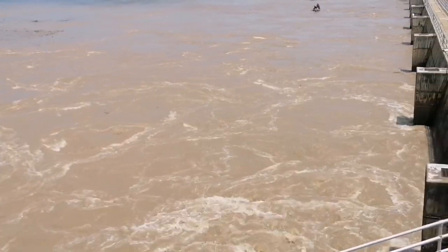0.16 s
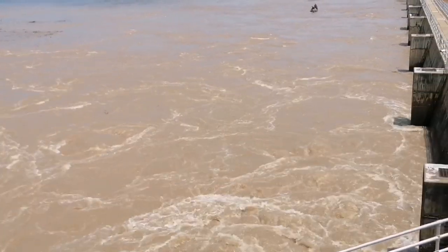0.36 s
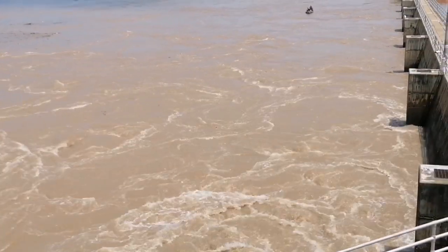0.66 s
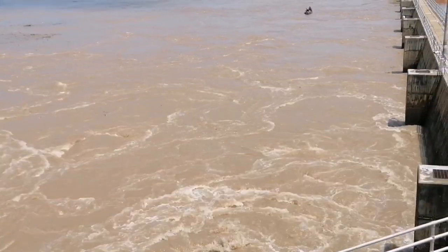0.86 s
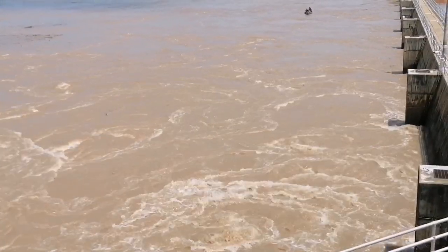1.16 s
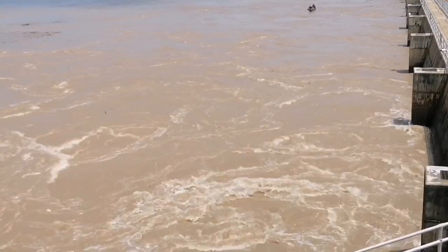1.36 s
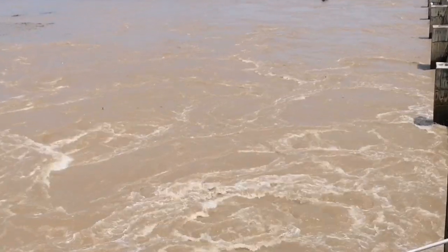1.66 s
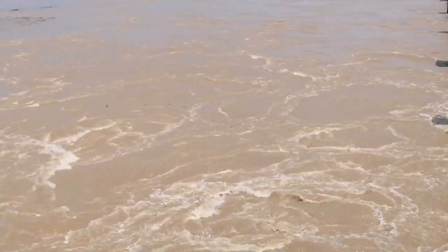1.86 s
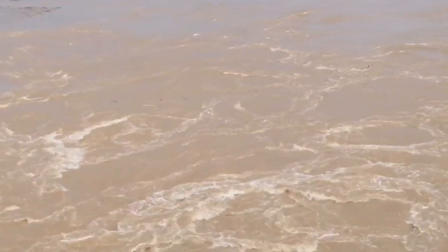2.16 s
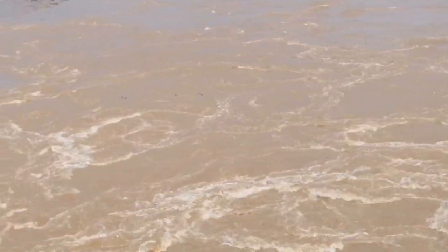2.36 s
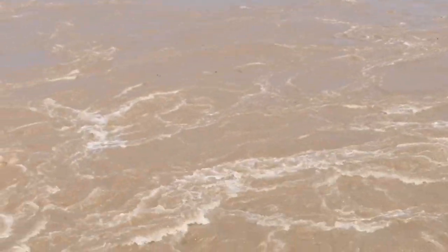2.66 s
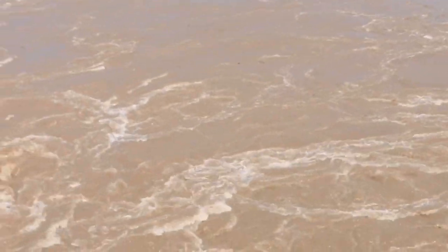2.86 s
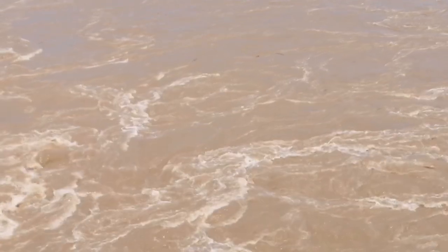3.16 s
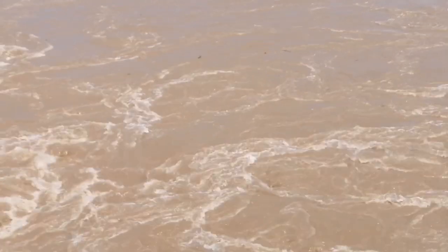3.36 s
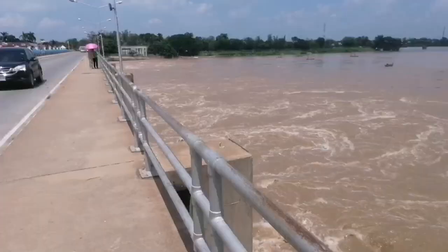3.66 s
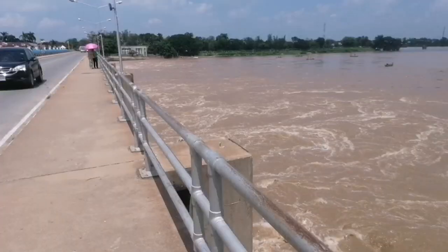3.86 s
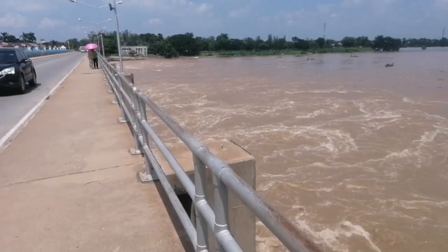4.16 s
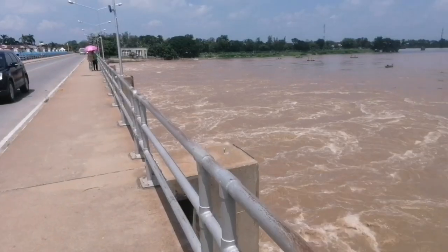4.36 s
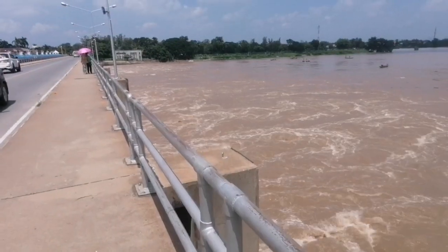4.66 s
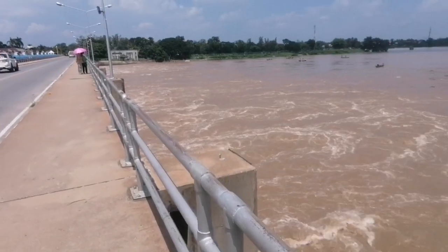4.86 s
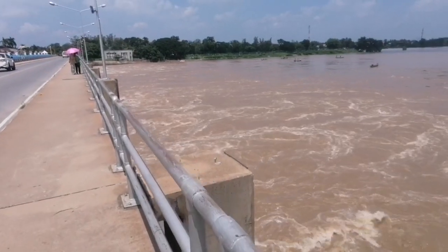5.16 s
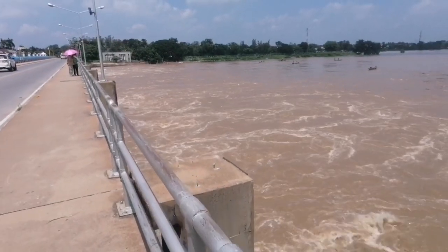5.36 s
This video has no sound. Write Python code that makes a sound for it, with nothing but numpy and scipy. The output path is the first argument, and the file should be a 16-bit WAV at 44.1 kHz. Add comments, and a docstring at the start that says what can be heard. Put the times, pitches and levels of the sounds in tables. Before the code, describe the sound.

Outdoors on a road bridge above open dam gates, a phone picks up a broad, steady roar of turbulent water. A single-cylinder motorcycle thumps past, loudest near 1.7 seconds, over a faint engine hum. The roar grows brighter and hissier on the right as the phone turns. Sound cuts out around 3.7 seconds, then resumes at about 4.1 with a slightly different roar and wind bumping the left side.

```python
"""Floodwater roars out of dam gates below a phone held on the road bridge: noise in flickering bands,
coloured for each port and partly shared between them, with hiss above it.
A single-cylinder motorcycle thumps past as pulses that ring its exhaust, a far engine hums as a sine,
and low traffic rumble swells as resonant noise. The phone slowly turns; after a silent pause it stands
further along the bridge, where wind, low rumble and single pressure pulses, buffets its left port."""
import sys
import numpy as np
from scipy import signal
from scipy.fft import rfft, irfft
from scipy.io import wavfile
from scipy.ndimage import uniform_filter1d

SR = 44100
rng = np.random.default_rng(int(sys.argv[2]) if len(sys.argv) > 2 else 0)


def to_wav(sig):
    """Store sig (one row per channel, or 1-D mono) as 16-bit WAV at the path in sys.argv[1].

    Samples outside -1..1 are clipped; the rate is SR.
    """
    pcm = np.clip(np.atleast_2d(sig), -1, 1) * 32767
    pcm = np.round(pcm).astype(np.int16)
    wavfile.write(sys.argv[1], SR, pcm.T)  # frames by channels


N = 242550
T = np.arange(N) / SR  # s
F = np.arange(N // 2 + 1) * SR / N  # Hz

# All levels hold ahead of the port ring and the gain control.
# Spectrum of the roar over the rail, before the turn.
# Each row: frequency [Hz], left port [dB per Hz], right port [dB per Hz].
RAIL_SPECTRUM = [(30, -70, -61), (150, -58.5, -53.5), (360, -59.5, -55.5), (550, -65.5, -59),
                 (800, -60.5, -53), (1180, -68.5, -58), (2200, -68.5, -56.5), (3250, -67.5, -67.5),
                 (4010, -73, -78.5), (5170, -71, -65), (6320, -75.5, -55.5), (7170, -85, -62),
                 (9180, -87, -84.5), (15000, -99.5, -85.5)]
# Spectrum of the roar towards which the turn leads.
# Each row: frequency [Hz], left port [dB per Hz], right port [dB per Hz].
TURNED_SPECTRUM = [(30.3, -63.5, -50.5), (150, -58.5, -51.5), (350, -55.5, -48), (520, -66.5, -56.5),
                   (776, -57.5, -50.5), (1120, -65.5, -54), (2210, -69.5, -56), (3180, -66.5, -59.5),
                   (3880, -73, -70.5), (5180, -67.5, -69), (6560, -76, -57), (7140, -87.5, -58.5),
                   (9800, -88, -79), (15000, -100.5, -85)]
# Spectrum of the roar further along the bridge.
# Each row: frequency [Hz], left port [dB per Hz], right port [dB per Hz].
BRIDGE_SPECTRUM = [(30, -71, -57.5), (154, -58.5, -54), (356, -57, -51), (614, -65, -57), (1010, -56, -56),
                   (1330, -63.5, -61), (2220, -62.5, -58.5), (3300, -66.5, -61.5), (3780, -71, -69),
                   (5500, -66.5, -61), (6570, -77, -65.5), (8130, -84.1, -79), (10000, -86.5, -80.5),
                   (15000, -98, -85.5)]
# Paths by which one water mass reaches both ports, at the rail and along the bridge.
# Each row: lag of the right port [ms], weight in the shared sound [0-1], frequency where it fades [Hz].
RAIL_PATHS = [(0.0, 0.72, 1300), (0.45, 0.16, 4000), (-0.45, 0.1, 4000)]
BRIDGE_PATHS = [(-0.13, 0.56, 950), (-0.31, 0.38, 1800)]
# The motorcycle as it passes. Each row: time [s], firing rate [Hz], level before panning [dB].
MOTORCYCLE_PASS = [(0.2, 26.9, -45.5), (0.55, 26.68, -34.5), (0.75, 25.95, -33.5), (1.2, 25.45, -29.5),
                   (1.45, 25.35, -25.5), (1.63, 24.63, -22.5), (1.87, 24.4, -22.5), (2.2, 24.12, -26.5),
                   (2.5, 24, -28), (2.7, 23.77, -35.5), (3.4, 23.44, -42.5)]
# Resonances of the exhaust pipe. Each row: frequency [Hz], width [Hz], relative gain [dB].
EXHAUST_RESONANCES = [(131, 56.6, 1), (50, 11, -10.5), (191, 72, -21)]
# The far engine. Each row: time [s], frequency [Hz], mean level before panning [dB].
ENGINE_HUM = [(0, 38.6, -45), (1.2, 38.3, -43), (1.8, 37.8, -39.5), (2.5, 36.8, -37), (3.0, 36.7, -37),
              (3.68, 36.2, -40)]
# Single eddies at the left port. Each row: time of the pulse [s], size [dB], time scale [ms].
EDDY_PULSES = [(4.251, -25, 3.2), (4.603, -14, 3.4), (4.756, -13, 3.7), (4.82, -21, 2.5), (4.864, -15, 2.1),
               (5.255, -23, 4.5)]
# Smooth moves of the hand. Each row: start [s], length [s], share of a whole turn [0-1].
PHONE_TURNS = [(-.5, 2.4, 0.14), (2.15, 0.59, 0.44), (3.08, 0.33, 0.32)]
# Gusts at the left port. Each row: start of the hold [s], length of the hold [s], level [dB].
WIND_GUSTS = [(2.03, 0.21, -39), (4.23, 0.074, -28), (4.5, 0.34, -30), (4.95, .3, -36.5), (5.3, .3, -32)]
# Swells of traffic rumble. Each row: start of the hold [s], its length [s], level before panning [dB].
TRAFFIC_SWELLS = [(.4, .05, -36), (2.35, .1, -37.5), (2.9, .05, -34), (4.3, .05, -34), (5.1, .05, -34.5)]

PAUSE_START_S, PAUSE_END_S = 3.6908, 4.0968
FLOW_WANDER_DB = 0.02  # rms of a very slight wander of the whole roar
HUM_PAN_DB = -9  # left minus right
A_FIRING_S = 1.6155  # one firing falls here and sets the phase of all others
BIKE_PAN_DB, BIKE_PAN_DB_PER_S = -10.5, -2.5  # left minus right at that firing, and its drift
GUST_RISE_DB_PER_S, GUST_FALL_DB_PER_S, BREEZE_DB = 109, 88, -56.5
TRAFFIC_RISE_DB_PER_S, TRAFFIC_FALL_DB_PER_S = 30.5, 12.5
HISS_LOW_HZ, HISS_HIGH_HZ, FINEST_LOW_HZ = 7550, 10100, 11120
HISS_DB, FINEST_DB = -37, -38.5  # at the right port after a whole turn
HISS_GROWTH, FINEST_GROWTH = 1.4, 3.5  # exponents on the turn
RING_HZ, RING_WIDTH_HZ, RING_DB = 14700, 700, 6
GAIN_ABOVE_DB, GAIN_RATIO, GAIN_S = -22, 1.25, .2  # threshold, ratio, time constant
TOP_HZ = 15450


def undb(db):
    """Amplitude follows level logarithmically: 20 dB are a factor of ten."""
    return 10 ** (np.asarray(db) / 20)


def curves(table):
    """Linear interpolation carries each column of a timed table to every sample."""
    seconds, *columns = np.transpose(table)
    return [np.interp(T, seconds, column) for column in columns]


def unit(x):
    """Dividing by the root mean square gives unit power."""
    return x / np.sqrt(np.mean(x ** 2))


def resonate(x, hz, width_hz):
    """Two equal resonators in series multiply their responses, which steepens the skirts."""
    b, a = signal.iirpeak(hz, hz / width_hz, fs=SR)
    once = signal.lfilter(b, a, x)
    return signal.lfilter(b, a, once)


def walk(rate_hz):
    """Random fluctuation of rms 1: independent values, held and then smoothed by two running means."""
    hold = int(SR / rate_hz)
    steps = np.repeat(rng.standard_normal(N // hold + 1), hold)
    smooth = uniform_filter1d(uniform_filter1d(steps, hold), hold)
    return unit(smooth[:N])


def panned(x, pan_db):
    """A level difference between the ports, split evenly about the mean level in dB."""
    left_minus_right = pan_db + 0 * T
    return x * undb(np.array([left_minus_right, -left_minus_right]) / 2)


def swells(table, rise_db_per_s, fall_db_per_s):
    """The loudest event governs: its level rises steadily, holds and falls steadily in dB."""
    levels = []
    for start, hold, db in table:
        before = np.maximum(start - T, 0)
        after = np.maximum(T - start - hold, 0)
        levels.append(db - rise_db_per_s * before - fall_db_per_s * after)
    return undb(np.max(levels, axis=0))


def turned():
    """Rotation of the phone as a sum of sine-squared moves, from 0 to 1 for a whole turn."""
    turn = 0
    for start, length, share in PHONE_TURNS:
        progress = np.clip((T - start) / length, 0, 1)
        turn = turn + share * np.sin(np.pi / 2 * progress) ** 2
    return np.clip(turn, 0, 1)


def traffic(hz=240, width_hz=260, lumpy_db=0.5, pan_db=-7):
    """Resonant low noise of distant traffic, with one waveform at both ports."""
    noise = resonate(rng.standard_normal(N), hz, width_hz)
    rumble = unit(noise * undb(lumpy_db * walk(9)))
    return panned(rumble * swells(TRAFFIC_SWELLS, TRAFFIC_RISE_DB_PER_S, TRAFFIC_FALL_DB_PER_S), pan_db)


def hum():
    """A pure tone is the sine of accumulated phase; its pitch drifts and its level wavers."""
    hz, db = curves(ENGINE_HUM)
    phase = 2 * np.pi * np.cumsum(hz) / SR
    tone = np.sqrt(2) * np.sin(phase) * undb(db + .8 * walk(6))
    return panned(tone * (T < PAUSE_END_S), HUM_PAN_DB)


def wind(rumble_hz=70, width_hz=110, lumpy_db=2, right_db=-25):
    """Turbulence at a port: eddies give lumpy low noise, and a few hard suction pulses that rebound."""
    noise = resonate(rng.standard_normal(N), rumble_hz, width_hz)
    rumble = unit(noise * undb(lumpy_db * walk(25)))
    gusts = swells(WIND_GUSTS, GUST_RISE_DB_PER_S, GUST_FALL_DB_PER_S)
    pressure = rumble * (undb(BREEZE_DB) + gusts)
    for seconds, db, ms in EDDY_PULSES:
        u = (T - seconds) * 1000 / ms
        suction = np.exp(-u ** 2)
        rebound = 0.53 * np.exp(-(u - 1.9) ** 2 / 1.6)
        pressure = pressure - undb(db) * (suction - rebound)
    return pressure * undb([[0], [right_db]])


def motorcycle(scatter_db=.8, jitter_ms=.25, fade_s=.15):
    """Impulse excitation of resonators: one slightly uneven firing a cycle rings the exhaust pipe."""
    hz, db = curves(MOTORCYCLE_PASS)
    cycles = np.cumsum(hz) / SR
    cycles_from_anchor = cycles - np.interp(A_FIRING_S, T, cycles)
    firings = np.flatnonzero(np.diff(np.floor(cycles_from_anchor)))
    timing, strength = rng.standard_normal((2, len(firings)))
    shift = (timing * jitter_ms * SR / 1000).astype(int)
    pulses = np.zeros(N)
    pulses[np.clip(firings + shift, 0, N - 1)] = -undb(scatter_db * strength)
    pipe = sum(undb(gain_db) * resonate(pulses, pipe_hz, width_hz)
               for pipe_hz, width_hz, gain_db in EXHAUST_RESONANCES)
    first_s, last_s = MOTORCYCLE_PASS[0][0], MOTORCYCLE_PASS[-1][0]
    fade = np.clip(np.minimum(T - first_s, last_s - T) / fade_s, 0, 1)
    pan_db = BIKE_PAN_DB + BIKE_PAN_DB_PER_S * (T - A_FIRING_S)
    return panned(unit(pipe) * undb(db) * fade, pan_db)


def spray(left_db=-22):
    """Filtered noise as thin, smooth hiss, which grows with the turn and favours the right port."""
    noise = rfft(rng.standard_normal((2, N)))
    above_low = 1 / (1 + (HISS_LOW_HZ / (F + 1)) ** 16)
    below_high = 1 / (1 + (F / HISS_HIGH_HZ) ** 40)
    above_finest = 1 / (1 + (FINEST_LOW_HZ / (F + 1)) ** 16)
    hiss = unit(irfft(noise * above_low * below_high, N))
    finest = unit(irfft(noise * above_finest, N))
    turn = turned()
    both = hiss * undb(HISS_DB) * turn ** HISS_GROWTH + finest * undb(FINEST_DB) * turn ** FINEST_GROWTH
    return both * undb([[left_db], [0]]) * (T < PAUSE_END_S)


def churn(slosh_db=.5, flicker_db=0.85):
    """Countless splashes superpose to noise: spectra of two water masses whose half-octave bands flicker."""
    spectra = rfft(rng.standard_normal((2, N)))
    octave = np.log2(np.maximum(F, 1))
    masses, slosh = 0, walk(5)
    for centre in np.arange(3.5, 14.6, .5):
        # neighbouring bands overlap and add up to a flat whole
        window = np.cos(np.pi / 2 * np.clip((octave - centre) * 2, -1, 1)) ** 2
        # the slower slosh is akin in neighbouring bands
        slosh = .8 * slosh + .6 * walk(5)
        level_db = slosh_db * slosh + flicker_db * walk(22)
        masses = masses + irfft(spectra * window, N) * undb(level_db)
    return rfft(unit(masses) * np.sqrt(SR / 2))  # mean density 0 dB per Hz


def at_ports(masses, spectrum, paths):
    """Partial coherence: the right port shares the delayed paths and hears the rest on its own."""
    hz, *port_db = np.transpose(spectrum)
    left_gain, right_gain = [undb(np.interp(np.log(F + 1), np.log(hz), db)) for db in port_db]
    shared = 0
    for lag_ms, share, fade_hz in paths:
        delay = np.exp(-2j * np.pi * F * lag_ms / 1000)
        shared = shared + share * np.exp(-(F / fade_hz) ** 2) * delay
    own = np.sqrt(np.clip(1 - np.abs(shared) ** 2, 0, 1))  # completes the power to 1
    left = left_gain * masses[0]
    right = right_gain * (shared * masses[0] + own * masses[1])
    return irfft(np.array([left, right]), N)


def water():
    """Directional colouring: the turn brings the right port to the spray, the second stand has its own hue."""
    masses, turn = churn(), turned()
    over_rail = at_ports(masses, RAIL_SPECTRUM, RAIL_PATHS)
    after_turn = at_ports(masses, TURNED_SPECTRUM, RAIL_PATHS)
    first_stand = (1 - turn) * over_rail + turn * after_turn
    second_stand = at_ports(masses, BRIDGE_SPECTRUM, BRIDGE_PATHS)
    roar = np.where(T < PAUSE_END_S, first_stand, second_stand)
    return roar * undb(FLOW_WANDER_DB * walk(1.9))


def scene():
    """Superposition: the pressures of all sources on the bridge add."""
    return traffic() + hum() + wind() + motorcycle() + spray() + water()


def gain_control(x):
    """Compression: above a threshold of running rms, both channels are turned down by one gain."""
    keep = np.exp(-1 / (GAIN_S * SR))
    power = signal.lfilter([1 - keep], [1, -keep], np.mean(x ** 2, axis=0))
    excess = np.maximum(np.sqrt(power) / undb(GAIN_ABOVE_DB), 1)
    return x * excess ** (1 / GAIN_RATIO - 1)


def record(dry):
    """Linear resonance of the ports, then compression, silence in the pause and a steep low-pass."""
    ring = signal.lfilter(*signal.iirpeak(RING_HZ, RING_HZ / RING_WIDTH_HZ, fs=SR), dry)
    heard = dry + (undb(RING_DB) - 1) * ring
    running = (T < PAUSE_START_S) | (T > PAUSE_END_S)
    low_pass = signal.ellip(10, .2, 80, TOP_HZ, fs=SR, output="sos")
    return signal.sosfilt(low_pass, gain_control(heard) * running)


dry = scene()
out = record(dry)
to_wav(out)
```